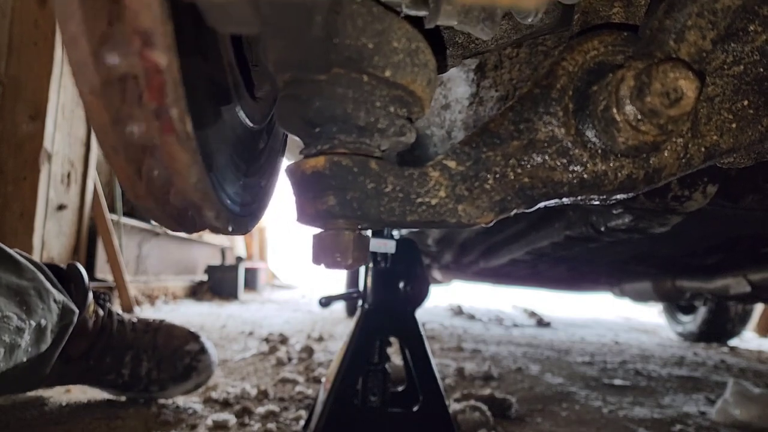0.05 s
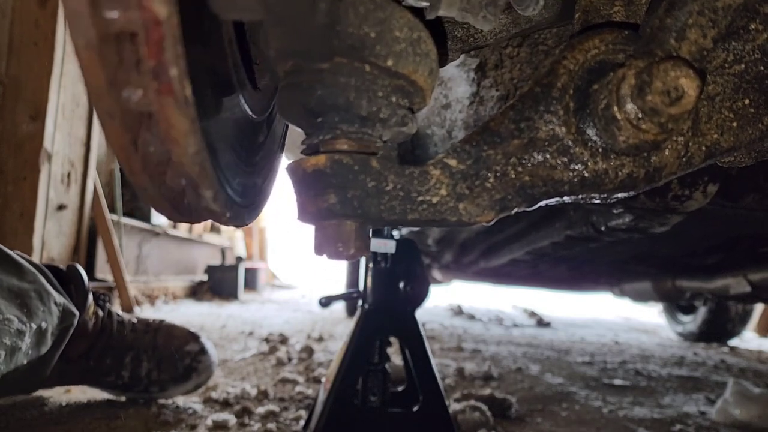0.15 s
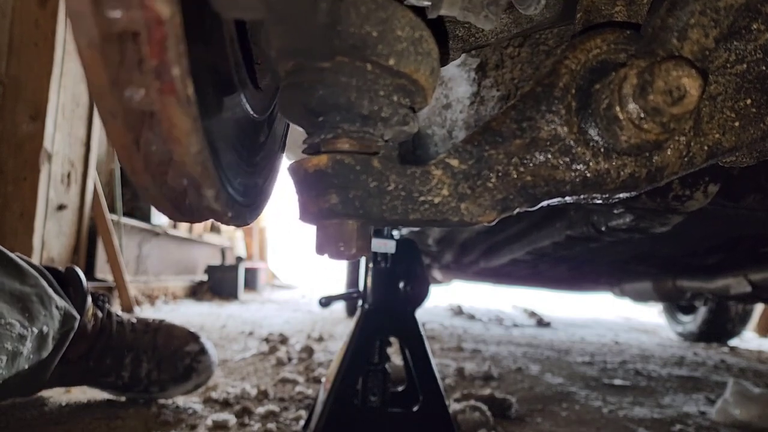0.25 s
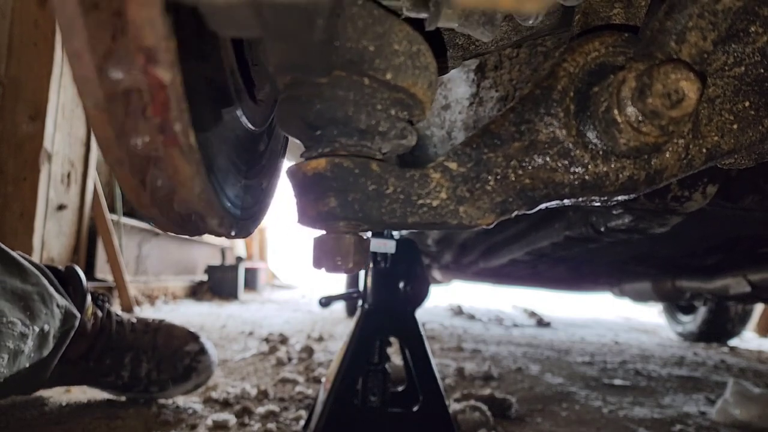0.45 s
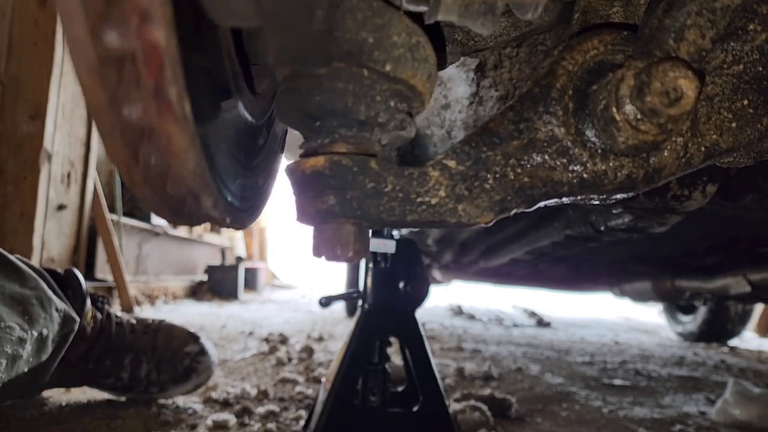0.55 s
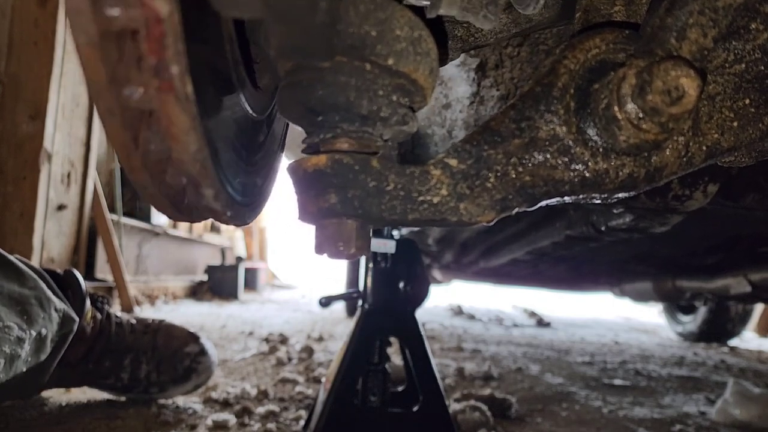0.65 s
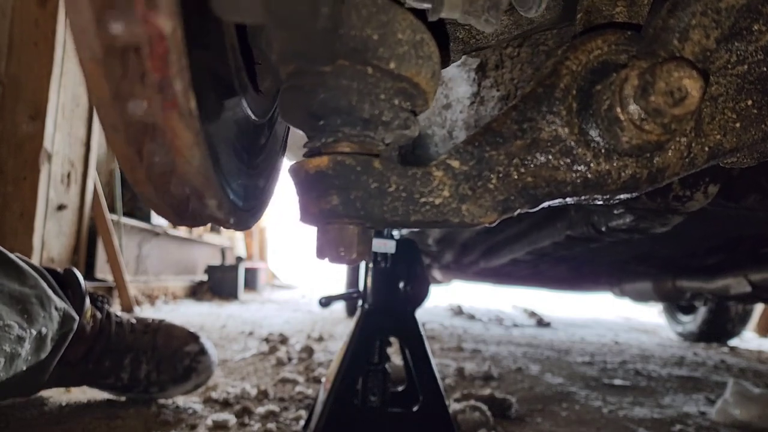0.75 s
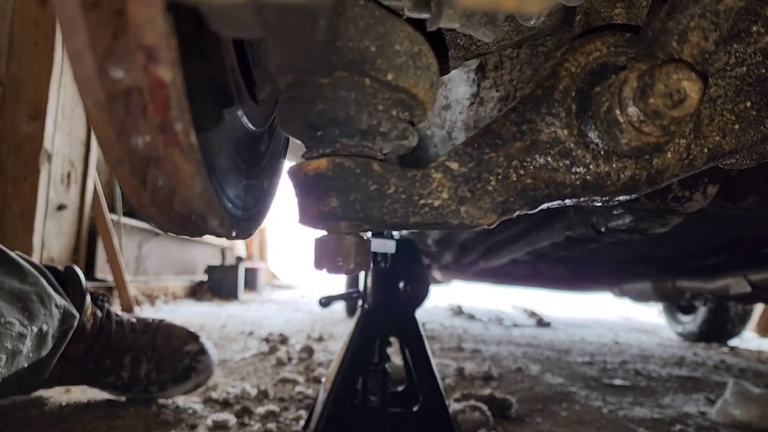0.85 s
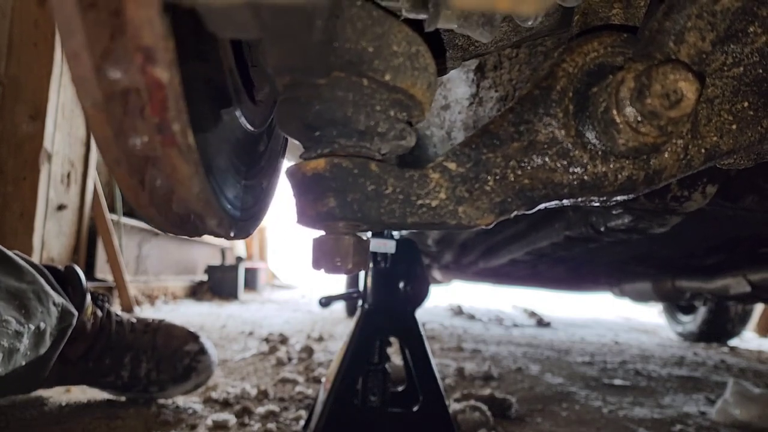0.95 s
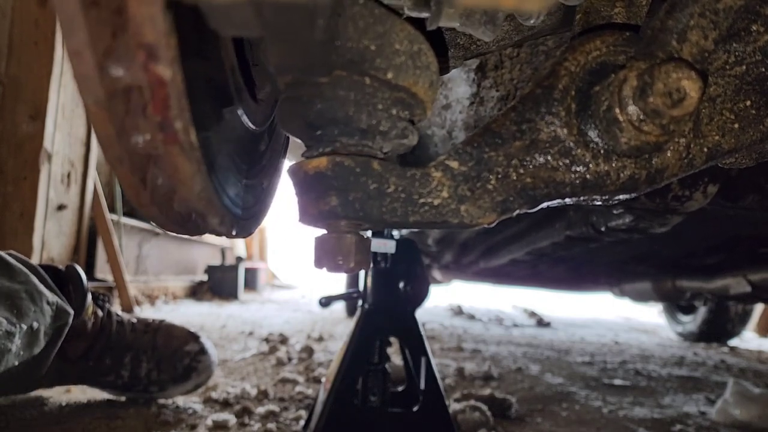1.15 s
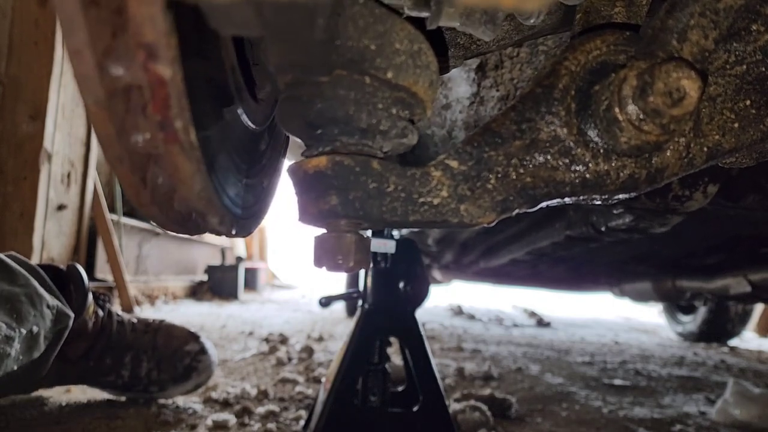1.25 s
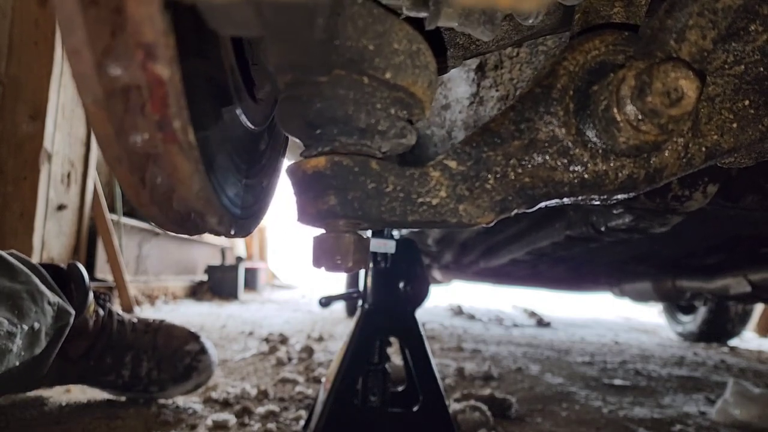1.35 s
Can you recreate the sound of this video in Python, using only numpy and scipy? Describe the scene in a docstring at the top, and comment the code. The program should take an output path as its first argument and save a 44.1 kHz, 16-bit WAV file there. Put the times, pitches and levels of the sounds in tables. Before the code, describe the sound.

Two heavy metal clunks from a worn ball joint as a car wheel is rocked.

```python
"""A loose ball joint clunks as a car wheel on a jack stand is rocked by hand. The place is a garage, with a
pair of microphones under the car, close beside the joint, over a low rumble. Each push drags the stud across
its socket until it slams home: the wheel thumps, the arm clanks, the garage booms, the coil spring hums on.
Each pull back scrapes and knocks lightly. Grit rustles to the left, and a sharp tick and a small clink follow
when the shaking stops."""
import sys
import numpy as np
from scipy import signal
from scipy.fft import rfft, irfft
from scipy.io import wavfile
from scipy.ndimage import uniform_filter1d

SR = 44100
rng = np.random.default_rng(int(sys.argv[2]) if len(sys.argv) > 2 else 0)


def dump_mix(stems):
    """Bounce the given channels to the path in sys.argv[1] as a 16-bit WAV at rate SR."""
    frames = np.atleast_2d(stems).T  # one column per channel
    limited = np.clip(frames, -1, 1)  # hard clip at full scale
    pcm = np.round(limited * 32767).astype(np.int16)
    wavfile.write(sys.argv[1], SR, pcm)


N = 61739

# The stud slams home. Each row: start in seconds, thump level in dB, crack level in dB,
# crack t60 in seconds, spring level in dB.
SLAMS = [(0.2152, -3, -36.5, 0.14, -22), (0.6784, -3.5, -21, 0.067, -26.5)]
# Spectrum of a metal-on-metal crack. Each row: frequency in Hz, level in dB.
CRACK_SPECTRUM = [(200, 10), (450, 9), (1200, 9), (1800, -20), (3000, -2.5), (4000, -7), (5500, -1.5),
                  (6800, -10), (7800, -7), (9600, -16), (11600, -4.5), (13000, -10), (15500, -15)]
CLANK_RISE_S, KNOCK_RISE_S, BOOM_RISE_S = 0.0012, 0.0016, 0.027
JOINT_PAN_DB, METAL_SPREAD_RAD = -1, 0.63


def undb(db):
    """Decibels to gain."""
    return 10 ** (np.asarray(db) / 20)


def pan(db):
    """Gains for the two microphones, the left one louder by db."""
    return undb(np.array([[db], [-db]]) / 2)


def add(out, start, sound):
    """Mix a sound in at start seconds; with a negative start it is already under way."""
    i = int(round(start * SR))
    if i >= 0:
        out[:, i:] += sound[..., :N - i]
    else:
        out[:, :i] += sound[..., -i:]


def envelope(rise, t60):
    """Smooth attack over rise seconds, on a decay of 60 dB in t60 seconds."""
    t = np.arange(N) / SR
    attack = np.sin(np.pi / 2 * np.minimum(t / rise, 1)) ** 2
    return attack * np.exp(-np.log(1000) * t / t60)


def noise(spectrum, wide_hz=780):
    """Coloured noise of unit level, alike at both microphones in the bass, unrelated in the treble."""
    hz = np.maximum(np.fft.rfftfreq(N, 1 / SR), 1)
    points_hz, points_db = np.array(spectrum).T
    gain = undb(np.interp(np.log(hz), np.log(points_hz), points_db))
    gain /= np.sqrt(1 + (points_hz[0] / 2 / hz) ** 4)  # rolls off below the lowest point
    mid, side = rfft(rng.standard_normal((2, N)))
    width = hz / np.hypot(hz, wide_hz)
    x = irfft(gain * (mid + np.array([[1], [-1]]) * side * width), N)
    return x / x.std()


def ring(modes, rise, spread=0):
    """Struck modes; with spread, each reaches the two microphones out of step."""
    t = np.arange(N) / SR
    lags = spread * rng.choice([-1, 1], len(modes))
    return sum(undb(db) * envelope(rise, t60) * np.sin(2 * np.pi * hz * t + lag * np.array([[1], [-1]]))
               for (hz, db, t60), lag in zip(modes, lags))


def friction(levels, spectrum, grain):
    """Noise broken into millisecond grains, following a level curve."""
    flutter = uniform_filter1d(rng.standard_normal(N), size=64) * 8  # unit variance
    grains = np.exp(grain * flutter - grain ** 2)
    level_db = np.interp(np.arange(N) / SR, *np.array(levels).T)
    return noise(spectrum) * grains * undb(level_db)


def room_tone():
    """The steady low rumble of the garage."""
    # Each row: frequency in Hz, level in dB.
    rumble_spectrum = [(25, -7), (55, -4.5), (85, -1.5), (125, -1.5), (250, -23.5), (400, -20.5),
                       (520, -33.5), (1500, -43.5), (5000, -53.5), (15000, -76)]
    return undb(-48.5) * noise(rumble_spectrum)


def garage_reverb(direct):
    """Floor, underbody and walls scatter sound back to the microphones; the lows linger longest."""
    # Each row: band centre in Hz, t60 in seconds, reverberant level in dB.
    bands = [(60, .55, -5), (150, 0.79, -13.5), (400, 0.47, -0.5), (520, 0.34, -4), (1060, 0.23, -12.5),
             (3000, 0.063, -9.5), (8000, 0.19, -15), (14000, 0.066, -11)]
    log_hz = np.log(np.maximum(np.fft.rfftfreq(N, 1 / SR), 1))
    log_centres = np.log([row[0] for row in bands])
    scatter = rfft(noise([(20, 0), (SR / 2, 0)]))
    tail = np.zeros((2, N))
    for selector, (_, t60, db) in zip(np.eye(len(bands)), bands):
        band_noise = irfft(scatter * np.interp(log_hz, log_centres, selector), N)
        fade = envelope(rise=0.0097, t60=t60)
        tail += undb(db) * band_noise * fade / np.linalg.norm(fade)
    return signal.fftconvolve(direct, tail, axes=1)[:, :N]


def grit():
    """Grit rustles and crumbs of rust crackle, towards the left microphone."""
    # Course of the rustle. Each row: time in seconds, level in dB.
    rustle_levels = [(0, -62.5), (.08, -73.5), (.125, -51), (.148, -64), (.2, -58), (.237, -45.5),
                     (.265, -64), (.33, -67.5), (.45, -60.5), (.525, -74.5), (.57, -54), (.605, -64),
                     (.8, -64), (.9, -60), (.97, -75), (1.24, -71.5), (1.315, -57.5), (1.4, -74)]
    # Spectrum of rustle and crumbs. Each row: frequency in Hz, level in dB.
    grit_spectrum = [(500, -4), (1800, 2), (4500, -7), (8000, -1.5), (10000, -12.5), (12500, 0),
                     (15500, -0.5)]
    # Single crackles. Each row: start in seconds, level in dB.
    crumbs = [(0.1184, -43.5), (0.125, -59), (0.135, -42.5), (0.1588, -42), (0.1727, -39), (0.176, -43.5),
              (0.551, -63.5), (0.5625, -67), (0.568, -42.5), (0.590, -57), (1.3383, -38)]
    out = friction(rustle_levels, grit_spectrum, grain=0.21) * pan(5.5)
    for start, db in crumbs:
        crackle = noise(grit_spectrum) * envelope(CLANK_RISE_S, t60=0.019)
        add(out, start, undb(db) * pan(4) * crackle)
    return out


def tick_and_clink():
    """A very bright tick on the left with a close reflection on the right, then a small metal clink."""
    # Spectrum of the tick. Each row: frequency in Hz, level in dB.
    tick_spectrum = [(1000, -41.5), (3300, -33), (4500, -31.5), (6500, -27.5), (8000, -14), (10000, -24),
                     (11500, -5.5), (12700, -2), (14000, -1), (15500, -9)]
    # Modes of the clink. Each row: frequency in Hz, level in dB, t60 in seconds.
    clink_modes = [(146, 6.5, 0.23), (368.4, -0.5, 0.53), (804, -5.5, 0.069), (1050, -12, 0.066),
                   (1870, 3, 0.042), (3990, 1.5, 0.076), (4100, -7, 0.044), (5350, 0, 0.081)]
    tick_s, reflection_delay_s, clink_s = 1.1325, 0.0027, 1.339
    out = np.zeros((2, N))
    tick_shape = envelope(rise=0.0034, t60=0.013)
    add(out, tick_s, undb(-11) * pan(6.5) * noise(tick_spectrum) * tick_shape)
    add(out, tick_s + reflection_delay_s, undb(-15) * pan(-17.5) * noise(tick_spectrum) * tick_shape)
    clink = ring(clink_modes, KNOCK_RISE_S, METAL_SPREAD_RAD)
    contact = noise(CRACK_SPECTRUM) * envelope(KNOCK_RISE_S, t60=0.096)
    add(out, clink_s, undb(-50.5) * clink + undb(-54.5) * contact)
    return out


def coil_spring():
    """The coil spring hums after every clunk and sways when the wheel swings back."""
    # Modes of the hum and of the sway. Each row: frequency in Hz, level in dB, t60 in seconds.
    hum_modes = [(59.6, -19, 3), (92.9, -3.5, 1.01), (118.8, -11.5, 1.92), (178.1, -12.5, 1.7),
                 (228.3, 1, 0.66), (265.4, -5, .36), (289, -23, 1.6), (363.7, -18, .9), (392, -19, 1.46),
                 (459, -43.5, 0.33)]
    sway_modes = [(59.27, 0, 1), (135, 0.5, 0.18), (228, -1, 0.1)]
    # The wheel swings back against its stop. Each row: start in seconds, level in dB.
    returns = [(-0.012, -38), (0.413, -28), (0.874, -27)]
    out = np.zeros((2, N))
    hum = ring(hum_modes, BOOM_RISE_S)
    add(out, -0.052, undb(-32) * hum)  # still humming from an earlier clunk
    for start, *_, spring_db in SLAMS:
        add(out, start, undb(spring_db) * hum)
    for start, db in returns:
        add(out, start, undb(db) * ring(sway_modes, BOOM_RISE_S))
    return out


def socket():
    """Close by, the stud scrapes, catches and snaps across the play in the joint, ringing its housing."""
    # The dry joint slides. Each row: time in seconds, level in dB.
    slide_levels = [(0, -80), (.07, -63), (.14, -58.5), (.2, -43), (.24, -42), (.29, -52), (.34, -65),
                    (.40, -53), (.46, -43), (.52, -57.5), (.612, -58), (.65, -41.5), (.74, -53.5),
                    (.82, -67), (.9, -41), (.96, -65.5), (1.02, -95), (1.4, -88)]
    # The stud catches and slips. Each row: start in seconds, contact level in dB,
    # contact t60 in seconds, housing level in dB.
    knocks = [(-0.006, -35, 0.079, -44.5), (0.154, -50, .05, -45), (0.1745, -41, 0.057, -38),
              (0.1865, -35, 0.025, -43), (0.197, -38, 0.06, -43.5), (0.2135, -29, 0.066, -47),
              (0.4095, -56, .03, -43.5), (0.4275, -46, 0.051, -37.5), (0.4424, -30, .05, -37),
              (0.616, -58, 0.021, -34.5), (0.636, -33, 0.064, -29.5), (0.654, -35.5, 0.1, -58),
              (0.669, -37.5, 0.082, -37), (0.848, -51.5, 0.051, -49), (0.8715, -51, 0.076, -35),
              (0.8875, -28, 0.031, -31.5)]
    # The stud snaps against the far side of the socket. Each row: start in seconds, level in dB.
    snaps = [(0.4891, -27), (0.9341, -27)]
    # Spectra of the three kinds of contact. Each row: frequency in Hz, level in dB.
    slide_spectrum = [(200, 6.5), (580, -2), (760, -1), (1200, -1.5), (1650, -7.5), (2200, -11),
                      (3000, -14), (4500, -20), (7000, -26), (10000, -32.5), (14000, -25.5)]
    knock_spectrum = [(150, -8), (350, 2.5), (550, 12), (620, -9.5), (750, 10.5), (1150, -5), (1650, -7.5),
                      (2200, -1.5), (2570, -14), (3000, -7), (4500, -16), (6500, -45), (10000, -48),
                      (14000, -38)]
    snap_spectrum = [(200, 14.5), (600, -21), (1300, 2), (2200, -6), (3100, -2), (4100, -15.5), (4550, -7),
                     (5800, -23), (7400, -21.5), (10000, -56), (14000, -43)]
    # Modes of the joint housing. Each row: frequency in Hz, level in dB, t60 in seconds.
    housing_modes = [(730, -7, 0.086), (845, -9.5, 0.13), (1006, -5.5, 0.074), (1157, 4.5, 0.028),
                     (1300, -15, 0.026), (1557, -8.5, .06), (2139, -4.5, 0.041), (2301, -7, 0.044),
                     (2974, -12, 0.047), (3680, -24, 0.07), (4340, -27.5, 0.073)]
    out = friction(slide_levels, slide_spectrum, grain=0.24)
    housing = ring(housing_modes, KNOCK_RISE_S, METAL_SPREAD_RAD)
    for start, contact_db, t60, housing_db in knocks:
        contact = noise(knock_spectrum) * envelope(KNOCK_RISE_S, t60)
        add(out, start, undb(contact_db) * contact + undb(housing_db) * housing)
    for start, db in snaps:
        contact = noise(snap_spectrum) * envelope(CLANK_RISE_S, t60=0.03)
        add(out, start, undb(db) * (contact + undb(-14.5) * housing))
    return out * pan(JOINT_PAN_DB)


def clunks():
    """The stud hits home beside the microphones: wheel thump, crack, arm clank, then the garage's boom."""
    # Modes of the wheel with its hub, and of the control arm.
    # Each row: frequency in Hz, level in dB, t60 in seconds.
    wheel_modes = [(97, -25, 0.15), (121, -8, 0.063), (143.6, 0.5, 0.13), (171, -13.5, 0.054),
                   (230.74, -12, 0.26), (279, -23.5, 0.045), (354.5, -29.5, .14), (428, -26, 0.092)]
    arm_modes = [(697, -11.5, 0.15), (846, -5, 0.067), (975, -23.5, 0.136), (1121, -9, 0.11),
                 (1144, -1, 0.049), (1270, -45, 0.076), (1530, -26, 0.098), (3670, -35.5, 0.098),
                 (4600, -35, 0.0383), (5540, -35, .13)]
    # The stud strikes the arm, seats and rebounds. Each row: start in seconds, level in dB.
    blows = [(0.2165, -21), (0.2285, -17.5), (0.2666, -37), (0.2845, -31), (0.2935, -34.5), (0.6775, -23.5),
             (0.691, -22), (0.722, -35), (0.744, -43.5), (0.764, -45.5)]
    # The dense, quickly damped clack of each blow. Each row: frequency in Hz, level in dB.
    clack_spectrum = [(250, -15), (440, 0), (600, -12), (720, -12.5), (900, 0.5), (1040, -15.5),
                      (1160, -1.5), (1290, -9), (1420, -28.5), (2200, -19), (4000, -51), (12000, -54)]
    # The wheel bumps softly as it takes up load and rebounds. Each row: start in seconds, level in dB.
    bumps = [(0.135, -30), (0.172, -27.5), (0.283, -15), (0.301, -14), (0.406, -22.5), (0.601, -29),
             (0.639, -34), (0.742, -14.5), (0.761, -19.5)]
    boom_hz, boom_db, boom_t60_s, boom_delay_s = 55.7, -13.5, 0.42, 0.034
    out = np.zeros((2, N))
    bass_cut = signal.butter(2, 80, "highpass", fs=SR, output="sos")
    thump = signal.sosfilt(bass_cut, ring(wheel_modes, rise=0.0052))
    bump = signal.sosfilt(bass_cut, ring(wheel_modes, rise=0.0081))
    for start, thump_db, crack_db, crack_t60, _ in SLAMS:
        add(out, start, -undb(thump_db) * thump)  # opposite in polarity to the bumps
        crack = noise(CRACK_SPECTRUM) * envelope(CLANK_RISE_S, crack_t60)
        add(out, start - CLANK_RISE_S, undb(crack_db) * pan(JOINT_PAN_DB) * crack)
        boom = ring([(boom_hz, boom_db, boom_t60_s)], BOOM_RISE_S)
        add(out, start + boom_delay_s, undb(thump_db) * boom)
    for start, db in blows:
        clack = undb(-2.5) * noise(clack_spectrum) * envelope(CLANK_RISE_S, t60=0.076)
        clank = ring(arm_modes, CLANK_RISE_S, METAL_SPREAD_RAD)
        add(out, start, undb(db) * pan(-0.5) * (clack + clank))
    for start, db in bumps:
        add(out, start, undb(db) * bump)
    return out


def scene():
    """From under the car: the suspension up close, the garage's reflections and rumble behind it."""
    direct = clunks() + coil_spring() + socket() + grit() + tick_and_clink()
    return direct + garage_reverb(direct) + room_tone()


def record(dry):
    """The right microphone is slightly louder; both cut off steeply above 15.4 kHz."""
    top_cut = signal.ellip(8, 0.2, 70, 15400, fs=SR, output="sos")
    return signal.sosfilt(top_cut, dry * pan(-0.9))


dry = scene()
out = record(dry)
dump_mix(out)
```